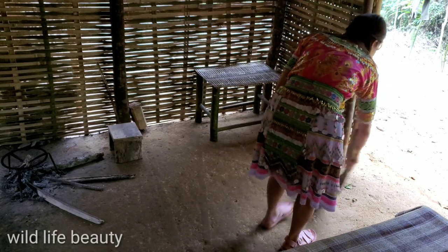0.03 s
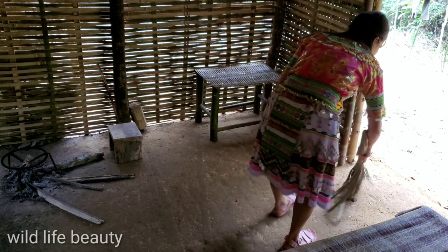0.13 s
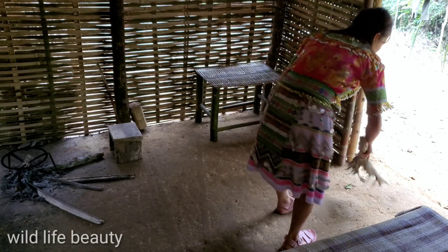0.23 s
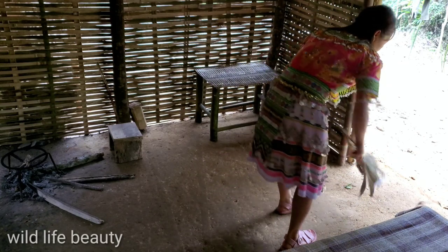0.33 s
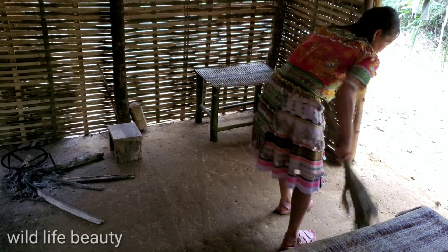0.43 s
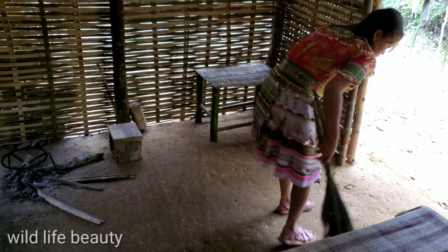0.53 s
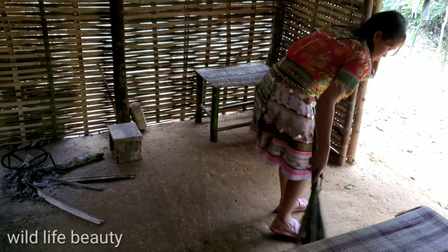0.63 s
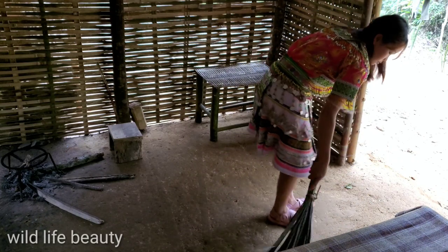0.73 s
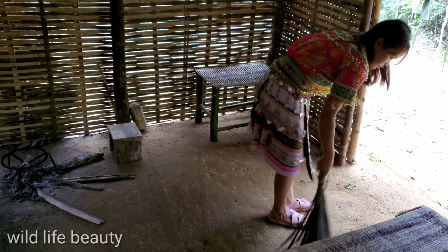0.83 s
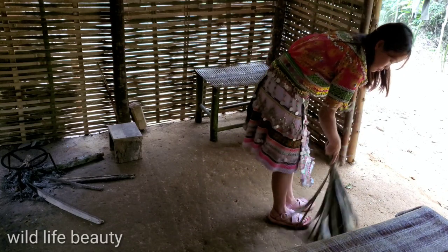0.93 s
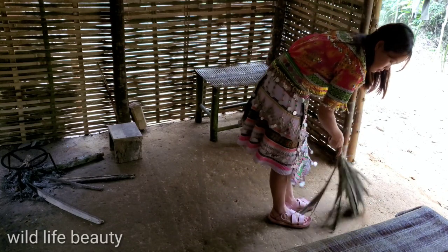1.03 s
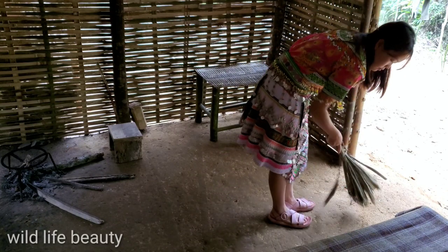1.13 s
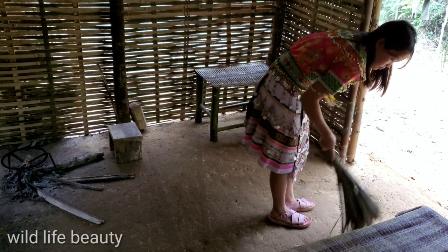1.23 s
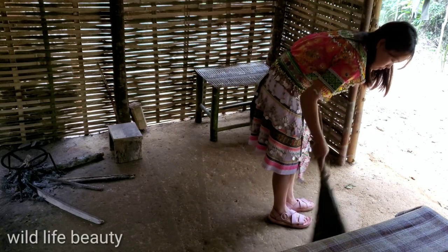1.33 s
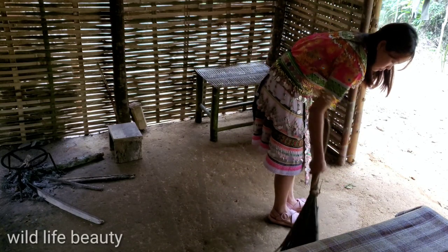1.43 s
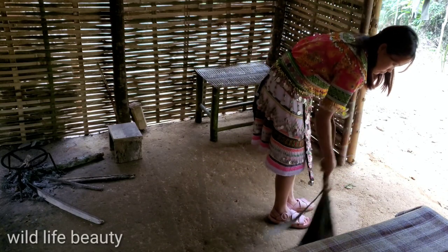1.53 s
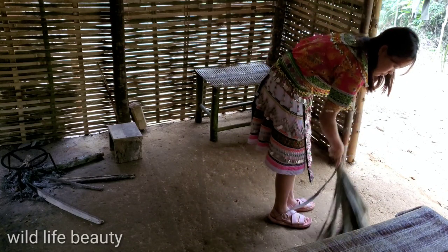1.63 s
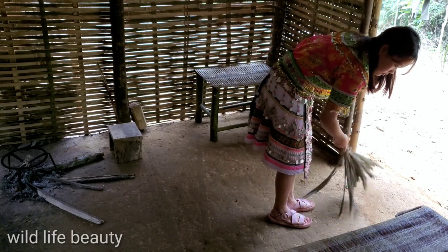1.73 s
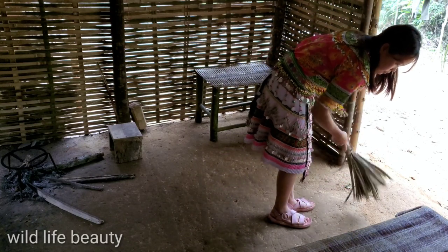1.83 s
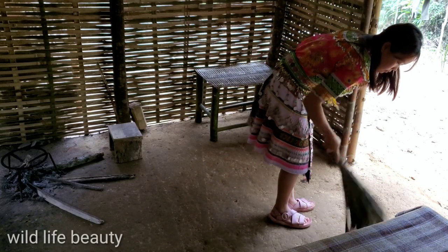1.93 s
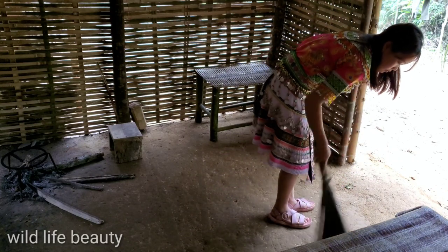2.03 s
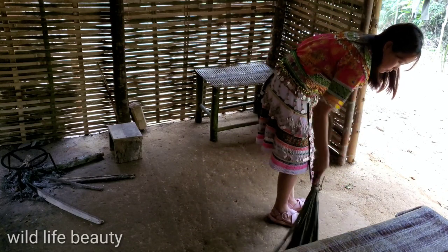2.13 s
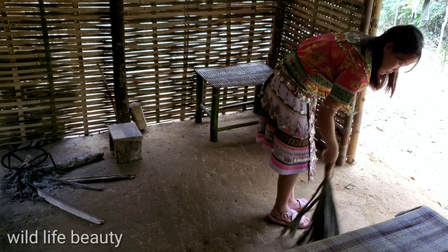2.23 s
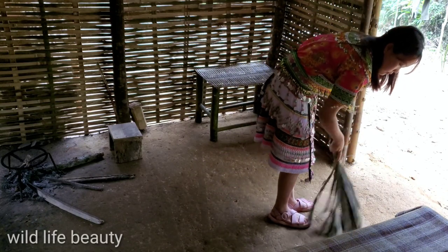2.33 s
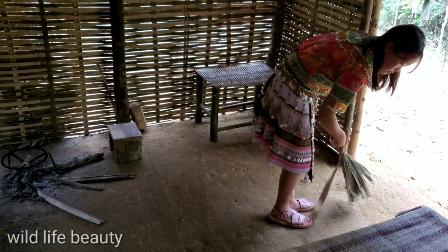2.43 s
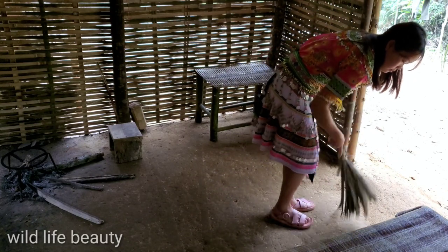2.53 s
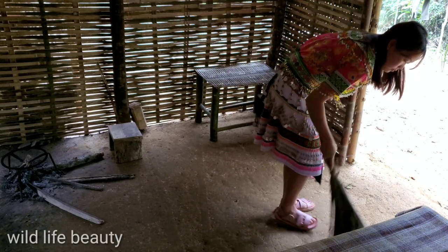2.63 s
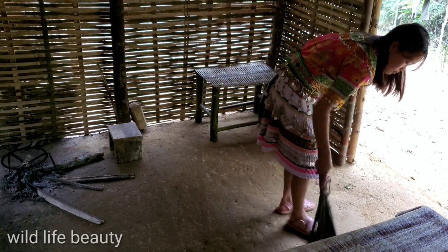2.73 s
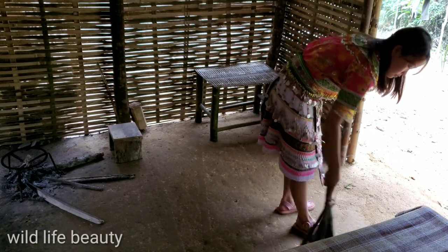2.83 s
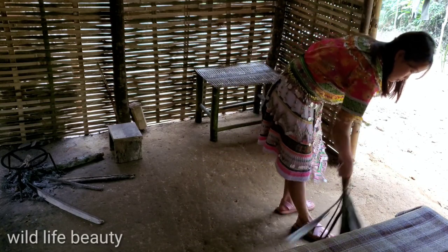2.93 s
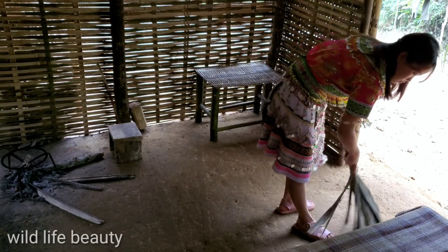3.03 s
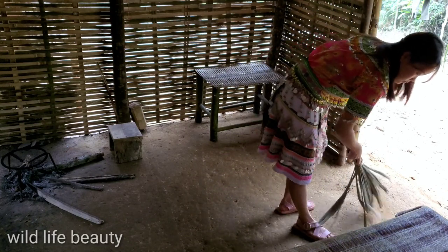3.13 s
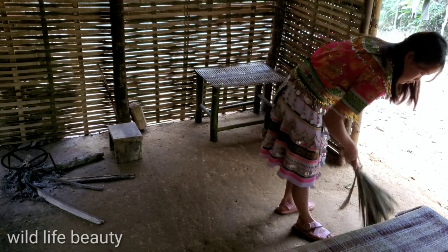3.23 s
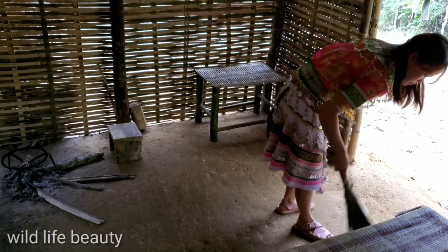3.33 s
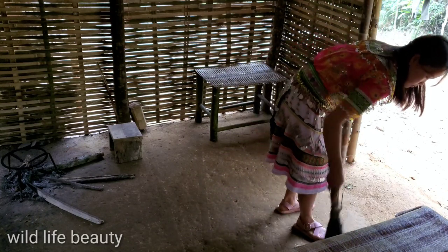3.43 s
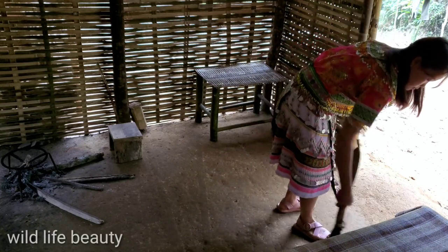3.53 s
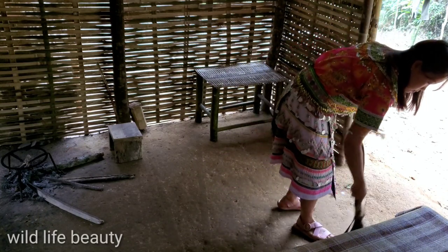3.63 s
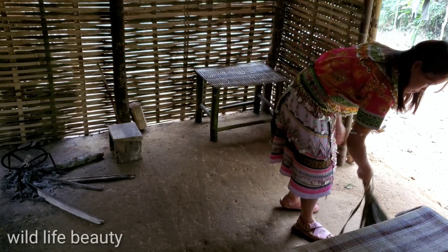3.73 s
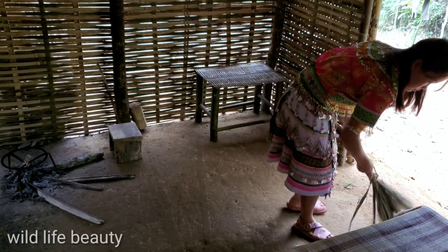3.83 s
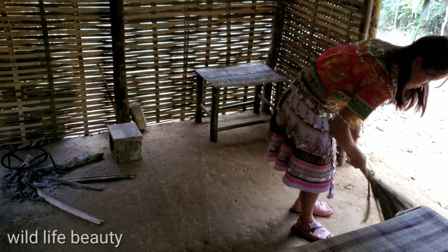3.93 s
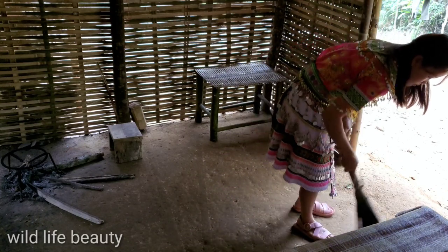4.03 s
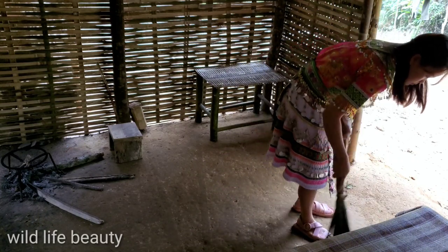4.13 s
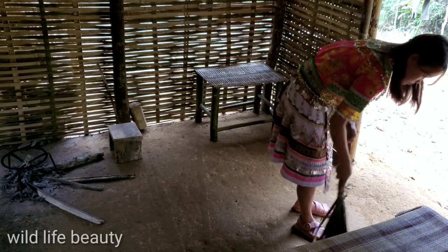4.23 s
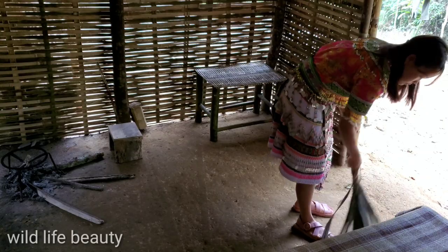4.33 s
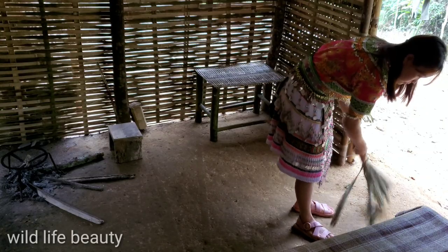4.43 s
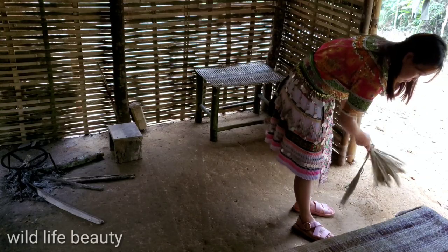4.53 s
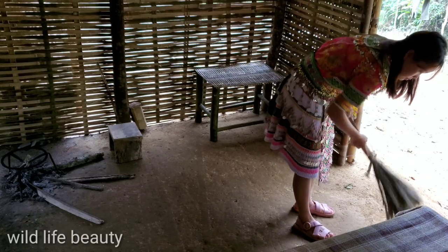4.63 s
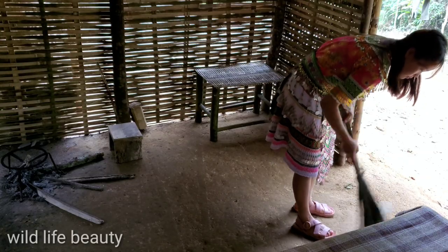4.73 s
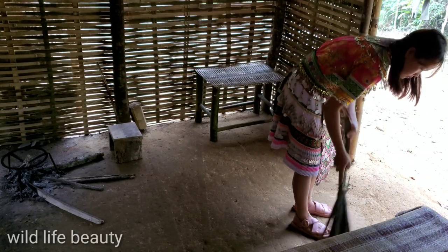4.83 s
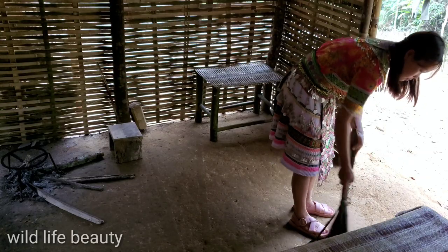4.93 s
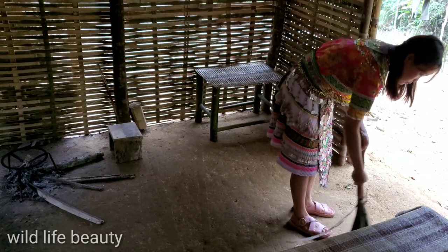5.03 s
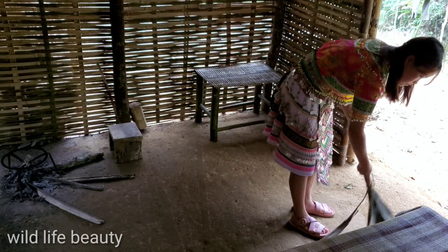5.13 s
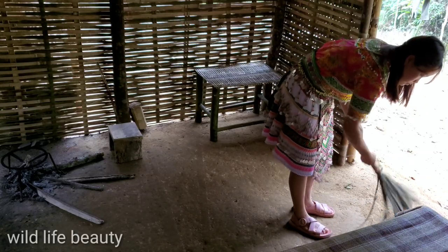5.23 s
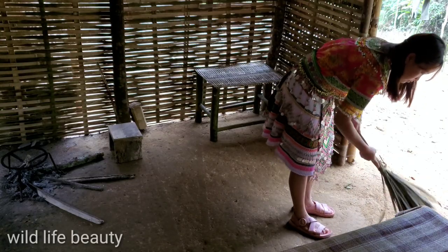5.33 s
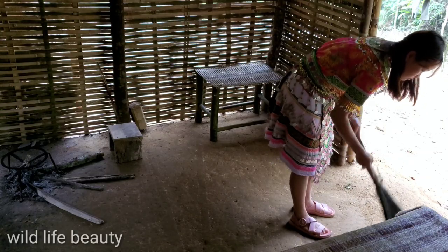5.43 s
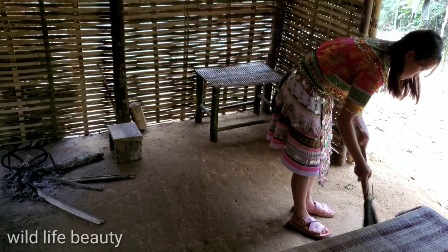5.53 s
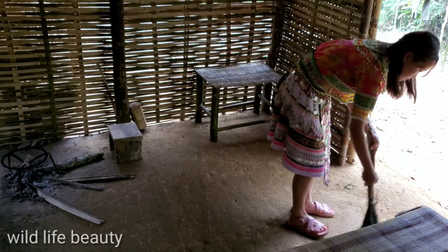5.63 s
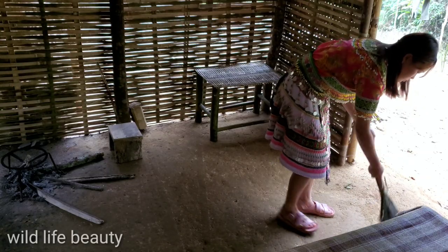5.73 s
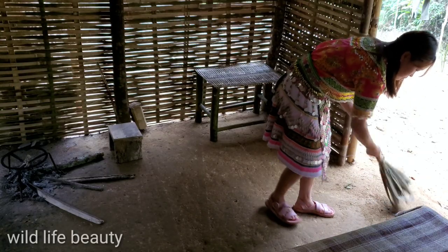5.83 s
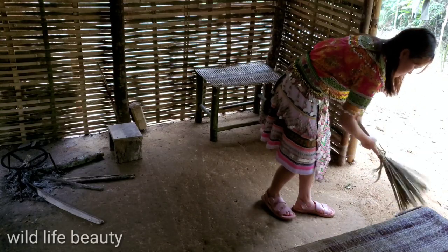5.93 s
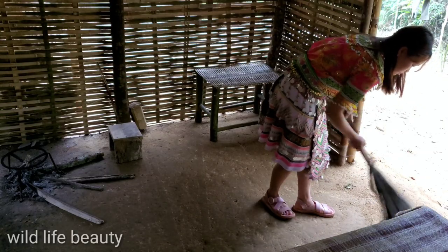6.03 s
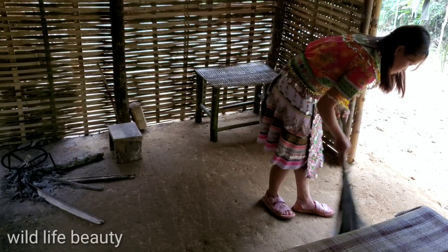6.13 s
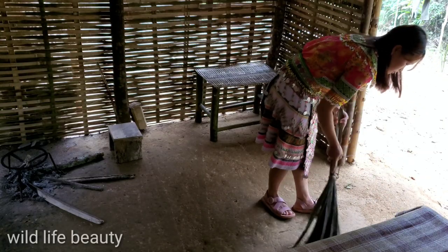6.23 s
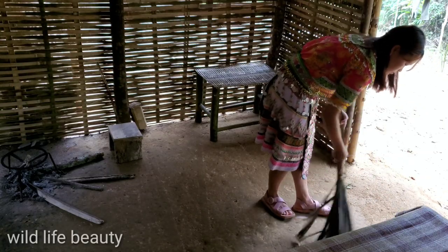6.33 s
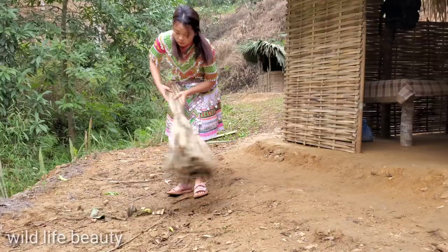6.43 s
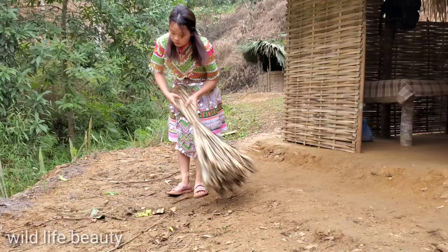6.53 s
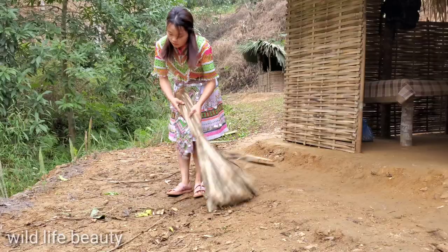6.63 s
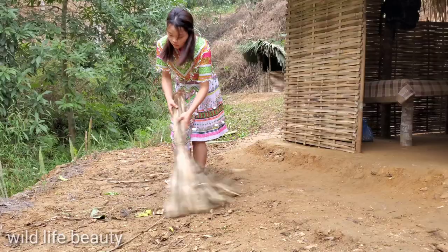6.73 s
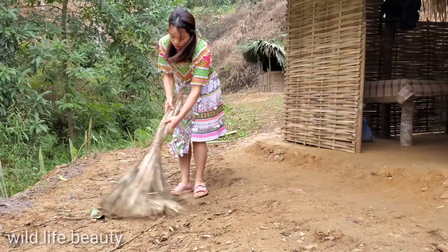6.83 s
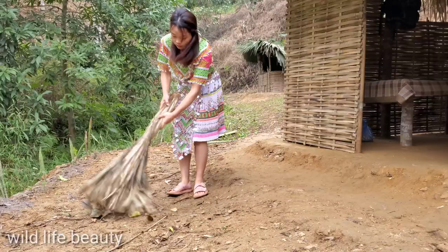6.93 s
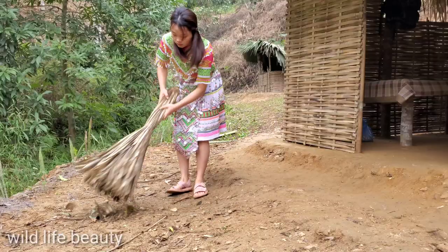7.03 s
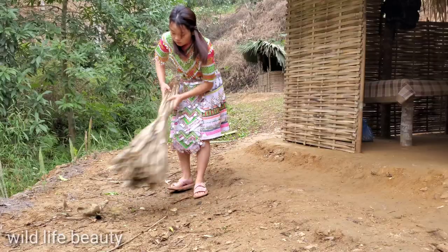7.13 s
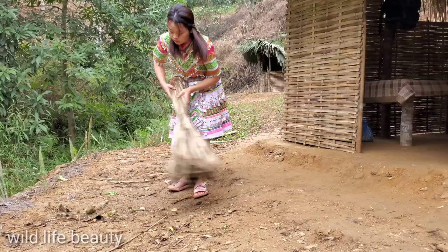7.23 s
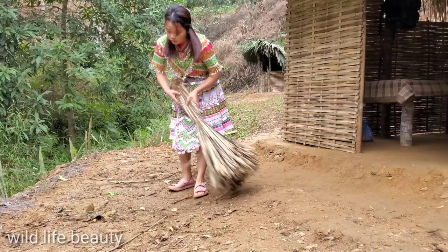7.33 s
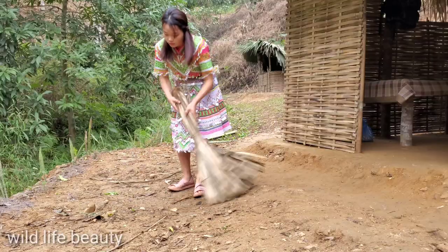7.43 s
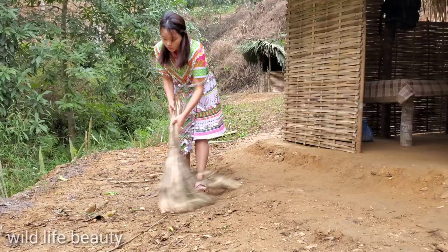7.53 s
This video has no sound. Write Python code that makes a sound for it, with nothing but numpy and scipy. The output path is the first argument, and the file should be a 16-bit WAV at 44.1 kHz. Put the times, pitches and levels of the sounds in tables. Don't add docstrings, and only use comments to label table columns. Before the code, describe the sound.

A dry-grass broom sweeps gritty packed dirt, heard fairly close in stereo through small microphones with thin bass. The tail of a stroke opens the sound; from 0.25 to 0.75 s a skirt's tiny metal discs rattle and clink brightly, with crisp grit ticks. Scratchy swishes then begin near 0.8, 1.5, 2.2, 2.9, 3.6, 4.25, 4.95, 5.6 and 6.25 s, each lasting about a third of a second. Flicks, stalk slaps and stem knocks stand out around 1.15, 1.8, 2.26, 3.2, 3.9 and 4.5 s, with a bright clink at 2.26 and soft low thuds. Woven hut walls add very short echoes. From about 6.6 s the scene cuts to the yard: rougher, lower-toned strokes at 6.6, 6.9 and 7.4 s, with a stronger thud near 7.2. Quiet leafy air and faint insect hiss continue throughout.

```python
import sys
import numpy as np
from scipy import signal
from scipy.io import wavfile
from scipy.ndimage import uniform_filter1d, minimum_filter1d

SR = 44100
rng = np.random.default_rng(int(sys.argv[2]) if len(sys.argv) > 2 else 0)


def ratio(d):
    e = np.asarray(d, float) / 20
    return 10 ** e


def to_wav(sig):
    pcm = np.clip(np.atleast_2d(sig), -1, 1) * 32767
    pcm = np.round(pcm).astype(np.int16)
    wavfile.write(sys.argv[1], SR, pcm.T)


N = 334719
T = np.arange(N) / SR
MOVE_S = 6.6
HUT_LAG, YARD_LAG = 7, -2

# f/Hz, density/dB
AIR_COLOUR = [(12, -49), (20, -2), (77, 0), (150, -7), (293, 0.5), (718, 0.5), (976, -5), (1610, -2),
              (2200, -6), (4000, -4), (6000, -5.5), (8300, -4.5), (9500, 1), (10600, -4), (16000, -5)]
# f/Hz, likeness/0-1
LIKENESS = [(25, 1), (60, 0.7), (110, 0.64), (180, 0.98), (550, 0.5), (1650, 0), (4970, 0), (15000, 0.04)]
# f/Hz, t60/s
ECHO_T60 = [(100, .2), (1000, .13), (3000, .065), (5000, .065), (15000, .06)]
# t/s, level/dB, f/Hz, t60/s
THUDS = [(0.741, -46, 176, 0.032), (0.845, -43, 172, 0.056), (1.158, -47, 186, 0.054),
         (1.795, -36, 184, 0.058), (2.214, -42, 192, 0.089), (2.451, -45, 169, 0.091),
         (2.909, -48, 152, 0.05), (3.197, -65, 200, 0.036), (3.627, -40, 177, 0.039),
         (3.892, -44, 193, 0.038), (4.352, -46, 172, 0.081), (4.518, -39, 140, 0.065),
         (4.956, -45, 126, 0.044), (5.745, -47, 188, 0.28), (5.927, -45, 194, 0.031),
         (6.64, -44, 213, 0.057), (6.919, -47, 83.4, 0.061), (6.949, -47, 200, 0.063),
         (7.053, -35.5, 100, 0.035), (7.088, -53, 99.6, 0.05), (7.186, -27, 149, 0.017),
         (7.219, -48, 161, 0.041), (7.36, -44, 166, 0.033), (7.434, -43, 83.4, 0.052),
         (7.5, -54, 198, 0.071)]
# multiple/1, level/dB
DISC_MODES = [(0.998, 1.5), (1.27, -8), (1.43, -10)]
# start t/s, length/s, level/dB, disc f/Hz
RATTLES = [(0.295, 0.044, -47, 9300), (0.426, .015, -48, 9130), (0.473, 0.075, -43.5, 9330),
           (0.568, 0.035, -40.5, 9710), (0.637, 0.038, -44.5, 9520), (0.685, 0.14, -44, 9470),
           (1.213, 0.05, -43, 9440), (1.284, 0.083, -43, 9350), (1.404, 0.022, -44, 9570),
           (1.453, 0.07, -47, 9380), (1.936, .01, -49, 9770), (1.975, 0.14, -50.5, 9380),
           (2.045, 0.16, -53, 9770), (2.577, 0.06, -48, 9500), (2.73, 0.059, -50.5, 9600),
           (3.13, 0.058, -38, 9500), (3.243, 0.042, -45, 9420), (3.324, 0.14, -44, 9360),
           (3.438, 0.061, -41.5, 9360), (3.495, 0.11, -47, 9330), (4.032, 0.062, -48, 9200),
           (4.135, 0.18, -50.5, 9400), (4.66, .015, -50, 9120), (4.704, .11, -54, 9570),
           (4.857, 0.079, -52, 9400), (5.384, 0.044, -49, 9500), (5.603, 0.018, -50, 9300),
           (6.005, 0.031, -47, 9300), (6.283, 0.03, -43, 9300), (7.124, .04, -52, 9300),
           (7.193, 0.044, -52, 9330), (7.262, 0.017, -50.5, 9030), (7.32, 0.086, -48, 9090)]
# t/s, level/dB, f/Hz
CLINKS = [(0.3002, -40, 9630), (0.5162, -49, 9590), (0.5412, -28, 9190), (0.5741, -40, 9770),
          (0.6953, -43, 9720), (0.7028, -40, 9170), (0.7327, -37, 9720), (0.7532, -41, 9170),
          (0.7986, -40, 9520), (0.9562, -29, 9260), (1.1508, -34, 10200), (1.2925, -42, 9570),
          (1.3653, -30, 8720), (1.4077, -42, 9810), (1.5584, -40, 9880), (1.6087, -35, 10200),
          (1.7968, -34, 9320), (1.9659, -44, 9320), (2.0777, -46, 9770), (2.2353, -37, 10500),
          (2.2573, -23, 10700), (2.393, -34, 9540), (2.9053, -42, 9750), (2.9073, -47, 9620),
          (3.1198, -32, 9360), (3.1532, -31, 9900), (3.3513, -35, 9480), (3.4481, -37, 9770),
          (3.5738, -42, 9040), (3.9125, -34, 9190), (4.2717, -39, 9750), (4.5311, -35, 9200),
          (4.8683, -44, 9810), (4.9821, -42, 10200), (5.0799, -39, 9960), (5.9005, -42, 9600),
          (6.0172, -47, 9130), (6.2921, -39, 9390), (6.6368, -44, 8940), (6.6782, -39, 8980),
          (7.0454, -41, 9320), (7.194, -41, 9460), (7.2674, -36, 9100), (7.415, -34, 9180),
          (7.451, -38, 9600)]
# t/s, level/dB, centre f/Hz, t60/s
TICKS = [(0.308, -10.5, 14700, 0.034), (0.4665, -21, 11700, 0.02), (0.5147, -16.5, 11900, 0.022),
         (0.5934, -33, 13400, 0.018), (0.6933, -18, 11400, 0.02), (0.7084, -37, 13100, 0.02),
         (0.7327, -34, 15500, 0.02), (1.233, -18, 11600, 0.031), (1.3664, -11.5, 12000, 0.017),
         (1.4194, -41, 15400, 0.02), (3.3513, -21, 11700, 0.02), (2.766, -29, 13000, .015),
         (4.089, -22, 13900, 0.02), (4.6623, -29, 14600, 0.033), (7.194, -17, 12500, .015),
         (7.2674, -25, 14500, 0.018)]
# t/s, level/dB, f/Hz, t60/s
KNOCKS = [(0.846, -38.5, 607, 0.088), (0.955, -40.5, 616, 0.12), (1.1487, -29, 4560, .012),
          (1.367, -29, 3060, 0.015), (1.3675, -31, 2600, .018), (1.799, -24, 2680, .015),
          (1.8085, -27, 3000, .012), (1.8145, -30, 4000, .012), (2.205, -41, 600, 0.13),
          (2.2625, -28, 3000, .012), (2.95, -39, 720, .12), (4.275, -44, 593, .1), (4.33, -41, 425, 0.17),
          (3.645, -46, 840, 0.14), (3.682, -38, 432, 0.11), (3.748, -40, 418, 0.18),
          (3.9055, -29, 3280, .012), (3.9135, -27, 3000, .012), (4.5298, -26, 2900, .012),
          (4.534, -28, 3650, .012), (4.538, -24, 2700, .012), (6.637, -46, 990, 0.012),
          (6.6429, -31, 1120, 0.013), (6.647, -32, 1110, 0.012), (6.826, -33, 840, 0.086),
          (6.827, -28, 1224, 0.072), (7.009, -39, 1300, 0.032), (7.0758, -32, 11800, .006),
          (7.1028, -28.5, 3860, 0.0093), (7.449, -27, 1600, 0.013)]
# t/s, level/dB, weight/dB, t60/s
SLAPS = [(0.8376, -29.5, -11.5, 0.1), (1.1477, -2.5, -57, 0.27), (1.3652, -1.5, -70, 0.046),
         (1.7982, 4.5, -41, 0.062), (2.255, -20, -28, 0.088), (2.9052, -30, -12, 0.12),
         (3.1793, 0, -46, 0.13), (3.2006, -4, -40, 0.058), (3.9039, -2, -41, 0.093),
         (4.2755, -26, -15.5, 0.15), (4.526, -15, -27, 0.06), (6.633, -25.5, -16, 0.069),
         (6.8293, -28.5, -3, 0.044), (7.1006, -43, -32, 0.085), (7.4151, -20.5, -20, 0.077),
         (7.448, -9, -38, 0.062)]
# touch t/s, rise/s, length/s, level/dB, sag by the end/dB
STROKES = [(-.12, .04, 0.33, -40, -4), (0.817, 0.048, 0.35, -39, -3.5), (1.51, 0.096, 0.29, -37, -5),
           (2.185, 0.074, 0.32, -36.5, -7.5), (2.881, 0.052, 0.34, -37.5, -8.5),
           (3.595, 0.044, 0.36, -41.5, -4), (4.255, 0.038, 0.3, -41, -2.5), (4.946, 0.038, 0.38, -45, 2),
           (5.618, 0.14, 0.22, -41.5, 0.5), (6.245, 0.11, 0.28, -41.5, -2),
           (6.624, 0.019, 0.26, -47.5, 7.5), (6.883, 0.03, 0.21, -45.5, 2),
           (7.405, 0.032, 0.48, -43.5, -0.5)]
# t/s, level/dB
FLICKS = [
    (1.157, -37.5),
    (1.807, -34),
    (2.266, -39),
    (2.47, -36.5),
    (2.494, -48),
    (3.193, -39.5),
    (3.91, -37),
    (4.533, -34.5),
]
# start t/s, length/s, level/dB
DRAGS = [(0.257, 0.1, -54), (.4, 0.25, -65), (0.71, 0.078, -57), (3.295, 0.15, -62), (4.02, 0.14, -62.5),
         (1.34, 0.11, -58.5), (1.935, .28, -62), (2.803, 0.043, -59.5), (3.54, .06, -56),
         (4.208, 0.15, -55.5), (4.873, 0.036, -56), (5.876, 0.072, -49), (6.193, 0.11, -77),
         (6.584, .05, -60), (7.12, .11, -55.5), (7.288, 0.11, -57.5)]
# middle t/s, length/s, level/dB, pressure/dB, weight/dB
SURGES = [(0.095, 0.17, -39, -5.5, -21), (0.89, 0.036, -39.5, -8, -29), (1.663, 0.097, -37.5, -2.5, -17),
          (2.304, .08, -55, 0, -12), (3.047, 0.068, -43.5, 9, 6), (3.162, 0.081, -41, -12, -5),
          (3.7, 0.079, -45, 16, 4), (3.77, 0.14, -39.5, -4, -16), (4.392, 0.1, -40.5, 0, -4),
          (5.144, 0.16, -39, -3.5, -25), (5.719, 0.13, -45.5, 7, 8), (5.816, 0.063, -40.5, 3, -38),
          (6.719, 0.12, -41.5, -3, -34), (6.836, 0.092, -41.5, 9, -16), (7.06, 0.14, -69, -16, -8),
          (7.55, 0.15, -37, -3.5, -33)]
# f/Hz, density/dB
HUT_SCRATCH = [(24, -60), (40, -42), (120, -17), (250, -12), (450, -13), (700, -12), (1000, -10.5),
               (1450, -4), (2150, -4), (2800, -1), (4500, -4), (7500, -6.5), (11600, -9), (16000, -11)]
# f/Hz, density/dB
YARD_SCRATCH = [(24, -53), (40, -17), (71, -10), (297, -11), (354, -4), (600, -5), (1070, -7.5), (1210, -1),
                (1700, -1.5), (2300, -7), (2900, -4), (4130, -3), (6650, -11), (12100, -14), (16000, -17)]
# f/Hz, width/Hz, level/dB
GROUND = [(194, 36, 9), (300, 45, 16.5), (416.5, 13.6, 12), (606, 108, 11), (767, 190, 3), (840, 6.4, -5.5)]


def evened(x):
    return x / np.sqrt(np.mean(x ** 2) + 1e-20)


def read(points, hz):
    f, value = np.transpose(points)
    return np.interp(np.log(hz + 1), np.log(f + 1), value)


def band(x, lo_hz, hi_hz):
    return signal.sosfilt(signal.butter(2, [lo_hz, hi_hz], "band", fs=SR, output="sos"), x)


def spectrum(x):
    return signal.stft(x, SR, nperseg=1024, noverlap=768)


def sound_from(z):
    return signal.istft(z, SR, nperseg=1024, noverlap=768)[1][:, :N]


def place(out, s, sound):
    out[round(s * SR):][:len(sound)] += sound


def hut_side(x):
    return np.array([np.roll(x, HUT_LAG), x])


def clicks(per_s, spread_db):
    size_db = spread_db * np.minimum(rng.exponential(1, N), 2.3)
    size = ratio(size_db) * rng.choice([-1., 1.], N)
    return size * (rng.random(N) < per_s / SR)


def plateau(t, start, length, db, edge_db_per_s):
    outside = np.maximum(np.maximum(start - t, t - start - length), 0)
    return db - edge_db_per_s * outside


def all_round(z, z2, hz):
    same = np.clip(read(LIKENESS, hz), 0, 1)[:, None]
    return np.array([z, same * z + np.sqrt(1 - same ** 2) * z2])


def air():
    level_db, patch_db = -52, 2.6
    hz = np.fft.rfftfreq(1024, 1 / SR)
    a, b, c, d, patches = rng.standard_normal((N // 256 + 5, 513, 5)).T
    patches = evened(uniform_filter1d(uniform_filter1d(patches, 14, 0), 12, 1))
    z = all_round(a + 1j * b, c + 1j * d, hz)
    z *= ratio(read(AIR_COLOUR, hz)[:, None] + patch_db * patches)
    return ratio(level_db) * evened(sound_from(z))


def wall_echoes(x):
    hut_db, yard_db, shift_s = -8.0, -10.0, .05
    taps = np.zeros((10, SR // 5))
    at = np.arange(100, SR // 5 - 20, 20) + rng.integers(0, 20, (10, (SR // 5 - 101) // 20))
    np.put_along_axis(taps, at, rng.choice([-1., 1.], at.shape), 1)
    hz, t, z = signal.stft(taps, SR, nperseg=128)
    fade = ratio(-60 * t / read(ECHO_T60, hz)[:, None])
    tails = signal.istft(all_round(z[:5], z[5:], hz) * fade, SR, nperseg=128)[1]
    tails /= np.linalg.norm(tails[0, 0])
    turn = abs((T / shift_s - np.arange(5)[:, None]) % 5 - 2)
    share = np.cos(np.pi / 2 * np.clip(turn, 0, 1))
    wet = signal.oaconvolve((x.mean(0) * share)[None], tails, axes=2).sum(1)[:, :N]
    return wet * ratio(np.where(T < MOVE_S, hut_db, yard_db))


def thuds():
    out, t = np.zeros(N + 8000), T[:8000]
    for s, db, hz, t60 in THUDS:
        push = np.sin(2 * np.pi * hz * t) * np.minimum(t / 0.0064, 1)
        place(out, s, ratio(db + 1.0 - 60 * t / t60) * push)
    return out[:N]


def shake():
    swing_db, still_db, edge_db_per_s = -24, -81, 514
    t, sweep_db = sweep()[:2]
    rattle_db = np.max([plateau(t, *row[:3], edge_db_per_s) for row in RATTLES], axis=0)
    start, length, _, hz = np.transpose(RATTLES)
    level_db = np.maximum(np.maximum(rattle_db, sweep_db + swing_db), still_db)
    return t, level_db, np.interp(t, start + length / 2, hz)


def spangles():
    hits_per_s, t60, size_spread_db, clump_db, scatter_hz = 1400, .02, 2.4, 3.0, 270
    s, shake_db, pitch_hz = shake()
    sizes_hz = np.linspace(8200, 10900, num=36)
    struck_hz = np.interp(T, s, pitch_hz) + scatter_hz * rng.standard_normal(N)
    disc = np.searchsorted(sizes_hz, struck_hz)
    hits = clicks(hits_per_s, size_spread_db)
    hits *= ratio(clump_db * evened(band(rng.standard_normal(N), 25, 80)))
    t, out = T[:1500], np.zeros((2, N))
    for k, hz in enumerate(sizes_hz):
        bend = 1 + .08 * rng.standard_normal(len(DISC_MODES))
        bend[0] = 1
        ring = sum(ratio(db - 60 * t / t60) * np.sin(2 * np.pi * hz * m * b * t)
                   for (m, db), b in zip(DISC_MODES, bend))
        clink = signal.oaconvolve(hits * (disc == k), ring)[:N]
        out += [np.roll(clink, 3 * k % 17), clink]
    return evened(out) * ratio(np.interp(T, s, shake_db) - 4.5)


def ticks():
    out, t = np.zeros(N + 2000), T[:2000]
    for s, db, hz, t60 in TICKS:
        noise = evened(band(rng.standard_normal(2000), 0.61 * hz, SR * .49))
        snap = noise * (0.23 + np.exp(-t / 0.00047)) + 0.47 * np.sin(2 * np.pi * hz * t)
        place(out, s, ratio(db - 15.5 - 60 * t / t60) * snap)
    return hut_side(out[:N])


def knocks():
    clink_db, clink_t60 = -4, .035
    out, t = np.zeros(N + 8000), T[:8000]
    clear = [(s, db + clink_db, hz, clink_t60) for s, db, hz in CLINKS]
    for s, db, hz, t60 in list(KNOCKS) + clear:
        ring = np.sin(2 * np.pi * hz * t) * np.minimum(t * hz / 1.7, 1)
        place(out, s, ratio(db - 60 * t / t60) * ring)
    out, yard = out[:N], T > MOVE_S
    return np.array([np.roll(out * ~yard, HUT_LAG) + np.roll(out * yard, YARD_LAG), out])


def slaps():
    rise_s, front, front_s = .002, .6, .004
    out, t = np.zeros(N + 8000), T[:8000]
    onset = np.minimum(t / rise_s, 1) * (1 + front * np.exp(-t / front_s))
    for s, db, weight_db, t60 in SLAPS:
        sharp, dull = rng.standard_normal((2, 8000))
        crack = evened(band(sharp, 2200, 17000))
        crack += ratio(weight_db + 33.5) * evened(band(dull, 210, 3300))
        place(out, s, crack * ratio(db - 32.0 - 60 * t / t60) * onset)
    return hut_side(out[:N]) * ratio([[-0.5], [0]])


def lift():
    lift_s, lift_db, from_db, full_db = .014, -7.0, -28, -12
    s, db = np.transpose(SLAPS)[:2, :, None]
    t = T[::32]
    before = s - t
    height = np.clip((db - from_db) / (full_db - from_db), 0, 1)
    dip = (height * (before > 0) * np.exp(-abs(before) / lift_s)).sum(0)
    return np.interp(T, t, ratio(lift_db * dip))


def stroke(t, touch, rise, length, db, sag_db):
    from_db, arch_db, leave_db_per_s = -27.5, -0.5, 248
    dust_db, dust_db_per_s = -14.5, 77
    since, one = t - touch, np.ones(len(t))
    part = np.clip(since / length, 0, 1)
    after = np.maximum(since - length, 0)
    level = db + from_db * np.maximum(1 - since / rise, 0) ** 2
    level += arch_db * (np.sin(np.pi * part) - 1) + sag_db * part
    weight = 1.5 - 18 * (1 - np.exp(-abs(since) / 0.036))
    press = 4 - 11.5 * part ** 0.98
    rustle = 2.5 + 8 * part
    grit = level + dust_db - dust_db_per_s * after
    return [(level - leave_db_per_s * after, weight, press, rustle),
            (grit, -10 * one, -16 * one, 26 * one)]


def sweep():
    t = T[::64]
    one = np.ones(len(t))
    parts = [(-64.5 * one, -6 * one, 0 * one, -16 * one)]
    for row in STROKES:
        parts += stroke(t, *row)
    for s, db in FLICKS:
        fall = np.where(t < s, 20 * (s - t) / .016, 266 * (t - s))
        parts.append((db - fall, -15 * one, -14.5 * one, -3 * one))
    for row in DRAGS:
        parts.append((plateau(t, *row, 298), -8 * one, -7 * one, 11 * one))
    for s, length, db, press_db, weight_db in SURGES:
        level = db - 6 * (2 * (t - s) / length) ** 2
        parts.append((level, weight_db * one, press_db * one, -2.5 * one))
    level, *colours = np.transpose(parts, (1, 0, 2))
    power = ratio(np.maximum(level, -120)) ** 2
    weight, press, rustle = [(power * c).sum(0) / power.sum(0) for c in colours]
    rustle += np.where(t > MOVE_S, 2, -1.5 * np.maximum(t - 4, 0))
    return t, 10 * np.log10(power.sum(0)), weight, press, rustle


def scratch_colour(hz, t, weight_db, press_db, rustle_db):
    in_hut, drift_db = t < MOVE_S, .8
    colour = np.where(in_hut, read(HUT_SCRATCH, hz)[:, None], read(YARD_SCRATCH, hz)[:, None])
    middle = (hz > 1800) & (hz < 6000)
    colour -= 10 * np.log10((ratio(colour[middle]) ** 2).sum(0) / len(hz))
    by_weight = read([(450, 0.46), (750, 0.069)], hz)[:, None]
    by_press = read([(450, 0.08), (750, 0.82), (1500, 0.62), (3200, 0.0066)], hz)[:, None]
    by_rustle = read([(1500, -0.071), (3000, 0.039), (5500, 0.066), (11000, 0.36)], hz)[:, None]
    colour += by_weight * (weight_db - np.where(in_hut, -11.0, -8.0))
    colour += by_press * (press_db - np.where(in_hut, -5.0, -1.5))
    colour += by_rustle * (rustle_db - np.where(in_hut, -2.0, -4.0))
    drift = rng.standard_normal(colour.T.shape)
    drift = uniform_filter1d(uniform_filter1d(drift, 10, 0), 12, 1).T
    return colour + drift_db * evened(drift)


def broom():
    tips_per_s, tip_spread_db, flicker_db = 32000, 2.4, .8
    lag_spread, wander, wander_per_s = 3.4, 2.2, 2.3
    hut_pan_db, yard_pan_db = 1.77, -1
    patch, tips = rng.integers(0, 6, N), clicks(tips_per_s, tip_spread_db)
    tips *= ratio(flicker_db * evened(band(rng.standard_normal(N), 8, 60)))
    hz, t, z = spectrum(tips * (patch == np.arange(6)[:, None]))
    in_hut = t < MOVE_S
    spot = np.array([-2.3, -1.3, -.6, .15, .95, 2.7])[:, None, None]
    pace = np.linspace(1, 2, 6)[:, None, None]
    lag = np.where(in_hut, HUT_LAG, YARD_LAG) + lag_spread * spot
    lag = lag + wander * np.sin(2 * np.pi * wander_per_s * t * pace)
    half_turn = 1j * np.pi * hz[:, None] * lag / SR
    z = np.array([(z * np.exp(way * half_turn)).sum(0) for way in (-1, 1)])
    s, level_db, *columns = sweep()
    colour_db = scratch_colour(hz, t, *(np.interp(t, s, c) for c in columns))
    side = np.array([.5, -.5])[:, None, None]
    z *= ratio(colour_db + side * np.where(in_hut, hut_pan_db, yard_pan_db))
    return sound_from(z) * ratio(np.interp(T, s, level_db) + 1.5) / tips.std()


def hollow(x):
    return x + sum(ratio(db - 9.5) * signal.lfilter(*signal.iirpeak(hz, hz / width, SR), x)
                   for hz, width, db in GROUND)


def scene():
    near = hollow(broom() * lift()) + slaps() + knocks() + ticks() + spangles()
    return near + wall_echoes(near) + thuds() + air()


def gate(x):
    lo_hz, hi_hz, share, duck_db, masking = 2100, 7600, .018, -28.0, .4
    hz, _, z = spectrum(x)
    inside = (hz > lo_hz) & (hz < hi_hz)
    power = uniform_filter1d((abs(z) ** 2).mean(0), size=5, axis=1) + 1e-20
    around = uniform_filter1d(power, size=41, axis=0)[inside]
    moment = minimum_filter1d(power[hz > lo_hz].mean(0), size=15)
    below = uniform_filter1d(power, size=4, axis=0)[inside] / around
    below *= (around / moment) ** masking
    weakest = (below < np.quantile(below, share)) * 1.
    shut = np.minimum(2 * uniform_filter1d(weakest, size=5, axis=1), 1)
    gain = np.ones(power.shape)
    gain[inside] = ratio(duck_db * shut)
    return sound_from(z * gain)


def roll_off(x):
    return signal.sosfilt(signal.butter(12, 16790, fs=SR, output="sos"), x)


def record(dry):
    thin = signal.sosfilt(signal.butter(2, 60, "high", fs=SR, output="sos"), dry)
    treble_cut = signal.firwin(1023, 15540, window=("kaiser", 3), fs=SR)
    mix = signal.oaconvolve(gate(thin), treble_cut[None], "same")
    return roll_off(mix)


dry = scene()
out = record(dry)
to_wav(out)
```